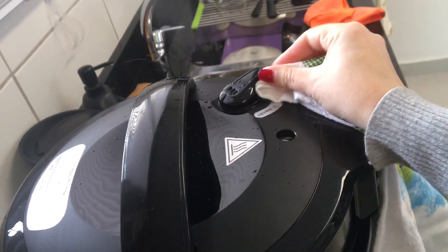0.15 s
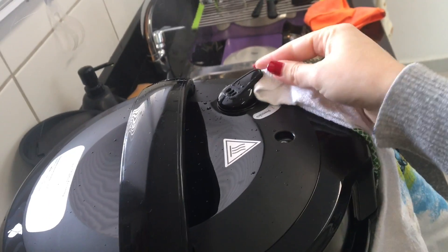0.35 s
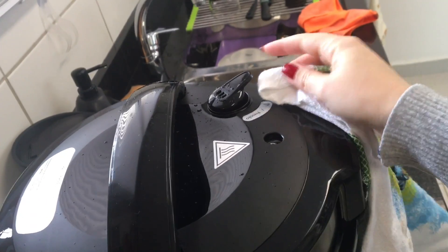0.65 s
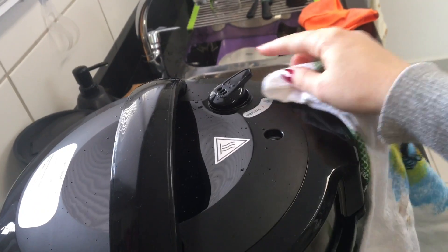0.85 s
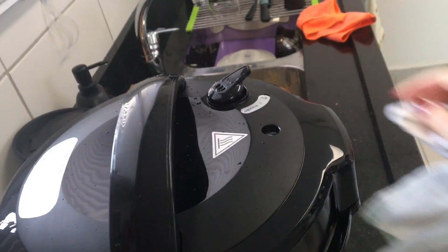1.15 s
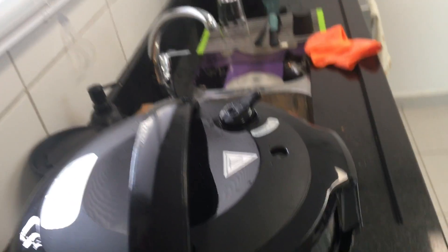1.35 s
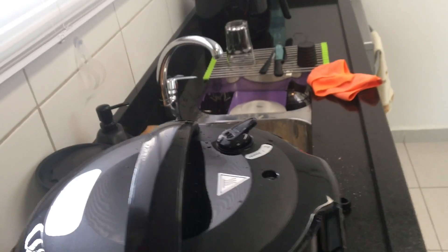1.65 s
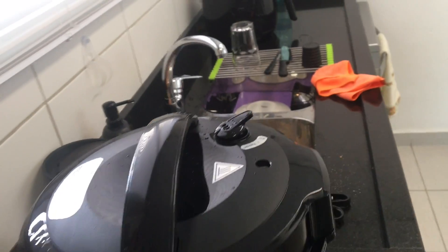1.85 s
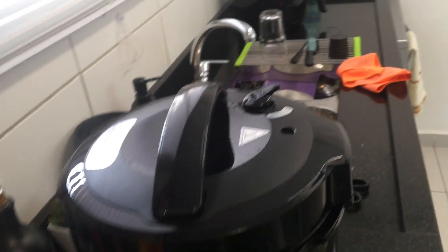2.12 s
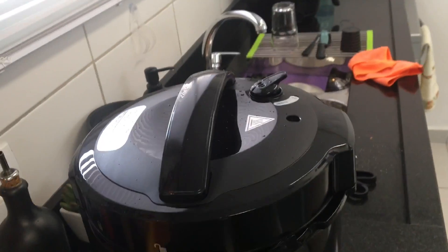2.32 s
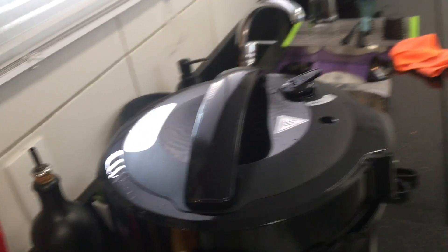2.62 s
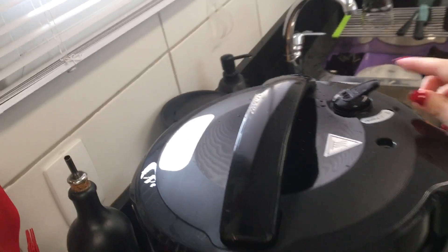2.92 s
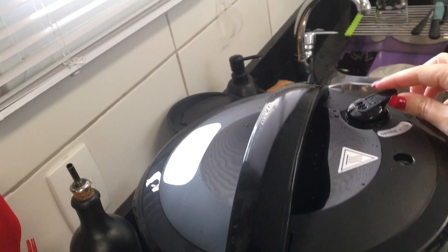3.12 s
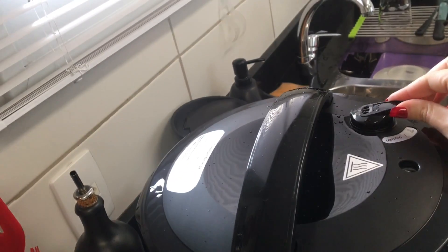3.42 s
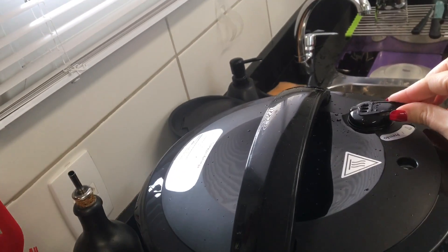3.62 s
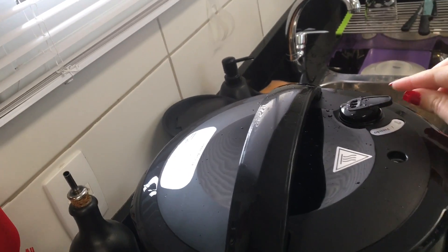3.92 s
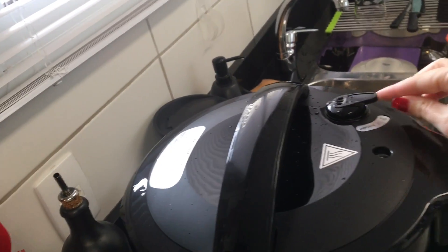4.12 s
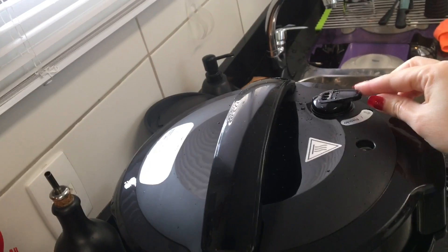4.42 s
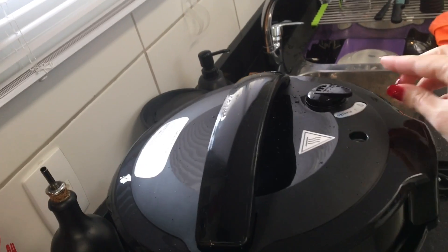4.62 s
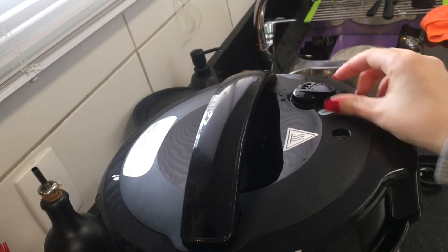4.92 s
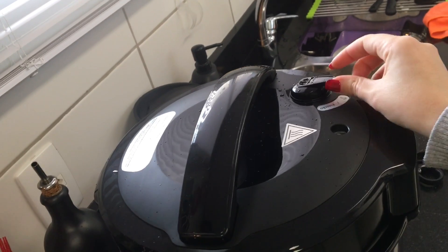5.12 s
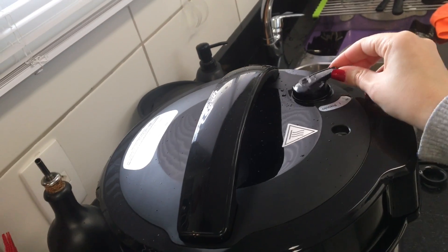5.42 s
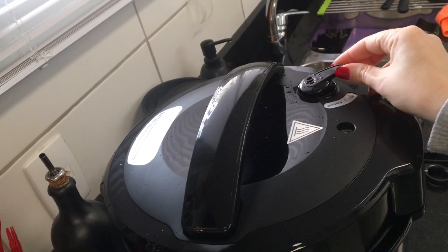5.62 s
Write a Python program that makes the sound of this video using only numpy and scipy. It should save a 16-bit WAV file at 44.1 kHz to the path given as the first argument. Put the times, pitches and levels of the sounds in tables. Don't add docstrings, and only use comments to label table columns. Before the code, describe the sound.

The sound opens mid-release: a loud, dense, bright jet of steam, very close, overdriving the microphone. At about 0.15 s the plastic valve handle snaps over with a strong hollow clack on the metal lid. The hiss, coloured by narrow airy resonances around 2 to 5 kHz with fizz above, declines steadily, noticeably softer by 1.5 s and thin by 3 s. A very faint low motor drone lies behind from roughly 1.3 to 2.5 s. From 3.3 to 3.8 s fingers nudge the handle, with soft dull knocks and slight swells in hiss. Near 4.5 s it lifts briefly, then shuts; the steam drops away into quiet low appliance rumble. Tiny nail ticks come at 5 s. At about 5.1 s the valve reopens with clicks, and a weaker puff swells around 5.25 s, then sinks by 5.6 s amid small taps. Short tiled-room reflections, centred.

```python
import sys
import numpy as np
from scipy import signal
from scipy.fft import rfft, irfft, next_fast_len
from scipy.io import wavfile
from scipy.ndimage import uniform_filter1d, map_coordinates

SR = 44100
rng = np.random.default_rng(int(sys.argv[2]) if len(sys.argv) > 2 else 0)


def generate_wav(sig):
    pcm = np.round(np.clip(np.atleast_2d(sig).T, -1, 1) * 32767).astype(np.int16)
    wavfile.write(sys.argv[1], SR, pcm)


def linear_from_db(decibels):
    return 10 ** (np.asarray(decibels, float) / 20)


N = 253575


def steam():
    # f/Hz, width/Hz, level/dB
    full = [(2224, 237, -3.5), (2510, 370, 0.0), (3240, 160, -14), (3900, 150, -14), (4390, 660, -6),
            (5090, 240, -7.5), (5640, 250, -9), (6400, 450, -12), (7000, 180, -10), (7580, 310, -14.5),
            (8170, 200, -11.5), (8820, 300, -10), (9450, 420, -8), (11000, 200, -10), (11560, 350, -9),
            (12770, 800, -11), (15200, 900, -22.5)]
    half = [(1266, 320, -15), (2227, 460, -3.5), (2662, 304, 2), (3375, 110, -7), (4034, 190, 2.5),
            (4576, 290, -0.5), (5300, 410, -6), (6030, 100, -8.5), (6830, 150, -16), (8650, 230, -10.5),
            (9500, 980, -10.5), (11200, 440, -10), (12150, 400, -10.5), (13000, 570, -11),
            (15300, 600, -16)]
    weak = [(2126, 370, -6.5), (2550, 260, -1.5), (3200, 120, -10), (3935, 160, -3), (4290, 320, -4.5),
            (5210, 260, -7), (5770, 270, -6.5), (6570, 220, -12.5), (9100, 300, -9), (9500, 400, -9.5),
            (10020, 250, -8), (10840, 400, -7.5), (11700, 270, -11.5), (12600, 400, -10.5),
            (13260, 460, -9.5)]
    leak = [(1850, 250, -10), (2570, 550, -1.5), (3800, 390, 1), (4350, 270, -9), (5560, 400, -20),
            (8900, 400, -3), (9600, 400, -6), (11800, 600, -14), (13150, 500, -7), (15100, 800, -14)]
    lifted = [(2070, 180, -22), (2300, 650, -8), (3420, 100, -8), (3846, 320, -1), (4360, 340, -9.5),
              (5050, 200, -17), (5520, 280, -12), (6150, 1100, -18.5), (8800, 200, -14), (9020, 960, -11),
              (11140, 370, -9), (11940, 1700, -8), (13100, 500, -22)]
    # f/Hz, level/dB per Hz
    breath_colour = [(150, -57), (300, -32.5), (480, -19.5), (650, -9.5), (900, -9.5), (1200, -7),
                     (1600, -4), (2200, -27), (4000, -120)]
    breath_lumps_db = 2

    hiss_db, fizz_db, breath_db, lift, pressure = valve()
    shares = [(1 - lift) * np.clip(1 - np.abs(pressure - k), 0, 1) for k in (2, 1, -0.08, -1)]
    shares.append(lift)
    caps = [
        cap(full, shear_db=4.5),
        cap(half, shear_db=3.5),
        cap(weak, shear_db=1.0),
        cap(leak, shear_db=-2.5),
        cap(lifted, shear_db=-9),
    ]
    upper = lambda f: 1 / (1 + (7600 / (f + 1)) ** 12)
    jet = np.zeros(N)
    for share, gain in zip(shares, caps):
        noise = eddies(patchy_db=1.04)
        hiss = unit(filtered(noise, lambda f: gain(f) * (1 - upper(f))))
        fizz = unit(filtered(noise, lambda f: gain(f) * upper(f)))
        jet += np.sqrt(share) * (hiss + linear_from_db(fizz_db - hiss_db) * fizz)
    sputter = linear_from_db(0.22 * wobble(7) + 0.47 * wobble(60) + 0.3 * wobble(600))
    jet *= linear_from_db(hiss_db - 1.0) * unit(sputter)
    breath = unit(filtered(eddies(patchy_db=-0.8), lambda f: linear_from_db(along(breath_colour, f))))
    return jet + linear_from_db(breath_db + breath_lumps_db * wobble(11)) * breath


def valve():
    # t/s, hiss level/dB
    flow = [(0, -8.5), (.6, -10), (1.37, -14), (1.75, -16), (2.02, -16.5), (2.2, -18.5), (2.88, -21),
            (3.3, -24.5), (4.15, -28.5), (4.5, -31), (5.75, -33)]
    # t/s, rise/s, hold/s, gain/dB, lift/0-1
    nudges = [
        (3.269, .18, .022, 5, .02),
        (3.56, 0.12, .11, 5.5, 0.13),
        (4.449, .065, .005, 5, 0.6),
        (5.226, .045, 0.22, 12.5, 0.74),
    ]
    # t/s, level/dB
    reopen = [
        (5.067, -47),
        (5.078, -16),
        (5.096, -4.5),
        (5.116, -4.5),
        (5.235, 0.5),
        (5.3, 0),
    ]
    reopen_s = reopen[0][0]
    full_until_s, spent_s = 0.91, 3.71
    settle_s = 0.024
    loose_per_s = 0.033
    shut_s, close_s = 4.52, 0.011
    tail_db, hiss_t60, fizz_t60, residue_db = -8, 0.52, 0.44, -40

    t = np.arange(N) / SR
    gain_db = np.zeros(N)
    lift = loose_per_s * t
    for start, rise, hold, db, raised in nudges:
        settling = max(settle_s * (db / 6) ** 2, .002)
        eased = ramp(start, rise) * np.exp(-np.maximum(t - start - rise - hold, 0) / settling)
        gain_db += db * eased
        lift += raised * eased

    shut = (t > shut_s) & (t < reopen_s)
    held_db = np.where(shut, gain_db[round(shut_s * SR)], gain_db)
    gap = linear_from_db(curves([(0, -120), (reopen_s - .001, -120), *reopen])[0])
    since = np.maximum(t - shut_s, 0)

    def dying(t60):
        closing = np.exp(-since / close_s)
        tail = linear_from_db(tail_db - 60 * since / t60)
        return (closing + tail) / (1 + linear_from_db(tail_db)) + linear_from_db(residue_db) * (since > 0)

    burst_db = 3 * np.exp(-t / 0.05)
    flow_db = curves(flow)[0] + burst_db
    hiss_db = flow_db + held_db + 20 * np.log10(dying(hiss_t60) + gap)

    late_gap = np.pad(gap, (round(.022 * SR), 0))[:N]
    aim_db = -0.56 - 1.3 * (1 - ramp(2.14 - .1, .2))
    fizz_open = dying(fizz_t60) * linear_from_db(-5 * ramp(shut_s, .1)) + late_gap
    fizz_db = flow_db + burst_db + aim_db + 0.47 * held_db + 20 * np.log10(fizz_open)

    near_db = 2.8 * (ramp(1.4, .1) - ramp(2.5, .3))
    breath_db = -26 + 0.75 * hiss_db + near_db

    leak = ramp(reopen_s - .1, .1) - ramp(5.2, 0.16)
    pressure = 2 * (1 - ramp(full_until_s, spent_s - full_until_s)) - leak
    return hiss_db, fizz_db, breath_db, np.clip(lift, 0, 1), pressure


def cap(modes, shear_db):
    # f/Hz, level/dB
    shear = [(1000, -57), (1800, -17), (3000, -19), (3600, -24.5), (4900, -23.5), (6000, -17.5),
             (7600, -24.5), (9000, -19), (10400, -22.5), (12000, -18.5), (14000, -20.5), (15700, -21.5)]

    def gain(f):
        power = linear_from_db(shear_db + along(shear, f)) ** 2
        for centre, width, db in modes:
            offset = 2 * (f - centre) / max(width, 130)
            power = power + linear_from_db(db) ** 2 / (1 + offset ** 2) ** 1.716
        return np.sqrt(power)

    return gain


def eddies(patchy_db):
    z = signal.stft(rng.standard_normal(N), nperseg=512)[2]
    field = uniform_filter1d(rng.standard_normal(z.shape), size=4, axis=0)
    field = uniform_filter1d(field, size=12, axis=1)
    return signal.istft(z * linear_from_db(patchy_db * unit(field)), nperseg=512)[1][:N]


def mirrored(x):
    # extra delay/s, level/dB, wander of the delay/s
    mirrors = [(.0016, -15.5, 0.000027), (.0043, -20.5, 0.000084), (.0078, -18.5, 0.00011),
               (0.0124, -15, 0.00014), (0.02, -20, 0.00031), (.027, -13, 0.00015)]
    out = x.copy()
    for delay, db, drift in mirrors:
        where = np.arange(N) - SR * (delay + drift * wobble(0.819))
        out += linear_from_db(db) * map_coordinates(x, [where], mode="mirror")
    return out


def handle():
    # t/s, peak level/dB
    clack = [
        (0.1446, 3.5),
    ]
    # f/Hz, level/dB, t60/s
    shell = [(89.8, -24.5, 0.092), (180, -18.5, 0.09), (262, -26, 0.17), (450, -12.5, 0.08),
             (555, -14, 0.15), (602, -11.5, 0.18), (648, -22, 0.29), (759, 0, 0.15), (780, -34.5, 0.3),
             (906, -13, .08)]
    # f/Hz, level/dB
    touches = [(.222, -43, -29, 634, -19), (2.458, -48, -30.5, 1190, -35), (3.354, -33.5, -47, 366, -29.5),
               (3.503, -27, -24, 377, -28), (3.803, -38, -37, 380, -26.5), (3.803, -44, -47, 750, -32.5),
               (4.575, -36, -35, 400, -29), (4.956, -55, -44, 740, -43), (5.078, -32.5, -31.5, 409, -30),
               (5.092, -39, -31, 1850, -33), (5.107, -32.5, -35, 244, -26), (5.108, -47, -32, 375, -22),
               (5.112, -42, -47, 777, -28), (5.248, -41, -28.5, 847, -30), (5.33, -48, -37, 585, -43),
               (5.400, -39, -24, 1340, -32), (5.44, -34, -29.5, 298, -33), (5.480, -37, -28, 686, -31),
               (5.515, -30.5, -28, 364, -23)]
    pushes = [
        (3.682, -36.5, -38, 612, -35),
        (4.540, -35, -34.5, 180, -35.5),
        (5.259, -44, -38, 374.6, -29),
        (5.521, -36, -40, 175.6, -26),
    ]
    # f/Hz, level/dB, t60/s
    lid = [(173, -2.5, 0.15), (277, 3, 0.093), (462, -2, 0.081), (625, 3.5, 0.053), (794, 2, 0.028)]
    # t/s, level/dB, length/s
    ticks = [
        (4.956, -45.5, 0.006),
        (4.999, -50, 0.05),
    ]
    touch_t60, push_t60 = 0.11, .3

    x = np.zeros(N + SR)
    for s, db in clack:
        knock = ring(shell, crack_db=6.5, rise=0.0015, rough=0.43)
        x[round(s * SR):][:SR // 2] += linear_from_db(db - 0.5) * knock
    contacts = [(*row, touch_t60) for row in touches] + [(*row, push_t60) for row in pushes]
    for s, thud_db, snap_db, *sings in sorted(contacts):
        modes = [(hz * rng.normal(1, 0.045), thud_db + db + rng.normal(0, 1.0), t60) for hz, db, t60 in lid]
        knock = ring(modes + [sings], snap_db + 9.5, rise=0.0016, rough=0.87)
        x[round(s * SR):][:SR // 2] += knock
    t = np.arange(SR // 10) / SR
    for s, db, length in ticks:
        scrape = linear_from_db(db - 6.5 * (t / length) ** 4) * rng.standard_normal(len(t))
        x[round(s * SR):][:len(t)] += scrape
    return x[:N]


def ring(modes, crack_db, rise, rough):
    t = np.arange(SR // 2) / SR
    tones = np.zeros(len(t))
    for hz, db, t60 in modes:
        wander = rough * wobble(45, size=len(t))
        decay = linear_from_db(db - 60 * t / max(t60, .02) + 2.6 * wander)
        tones += decay * np.sin(2 * np.pi * hz * t + wander)
    band = signal.butter(2, [250, 2300], "band", fs=SR, output="sos")
    click = 0.91 * (t < .0002)
    blow = rng.standard_normal(len(t)) * linear_from_db(-60 * t / 0.052) + click
    return tones * (1 - np.exp(-t / rise)) + linear_from_db(crack_db) * signal.sosfilt(band, blow)


def kitchen(x):
    # f/Hz, t60/s
    tiles = [(200, 0.59), (2000, 0.22), (10000, 0.14)]
    hz, t, z = signal.stft(rng.standard_normal(SR // 2), SR, nperseg=256)
    fading = linear_from_db(-60 * t / along(tiles, hz)[:, None])
    tail = signal.istft(z * fading, SR, nperseg=256)[1]
    late = np.pad(x, (300, 0))
    return signal.fftconvolve(late, tail / np.linalg.norm(tail))[:N]


def background():
    # f/Hz, level/dB per Hz
    rumble_colour = [(15, -48.5), (30, -15), (55, -9), (75, 1), (100, -4.5), (130, -7), (170, -12.5),
                     (260, -16), (600, -22), (1100, -25), (2000, -34), (4500, -45), (12000, -50.5),
                     (15500, -59)]
    t = np.arange(N) / SR
    noise = filtered(eddies(patchy_db=0.9), lambda f: linear_from_db(along(rumble_colour, f)))
    low = filtered(noise, lambda f: 1 / (1 + (f / 400) ** 2))
    lull_db = -2 * np.exp(-((t - 1.3) / 0.8) ** 2)
    low_gain = linear_from_db(-41.5 + .5 * wobble(1.5) + lull_db)
    rumble = (low_gain * low + linear_from_db(-38.5) * (noise - low)) / np.std(noise)
    running = ramp(1.3, .15) - ramp(2.4, .12)
    drone = linear_from_db(-47.5 + 2.5 * wobble(12)) * np.sin(2 * np.pi * 265 * t)
    return rumble + running * drone


def unit(x):
    return x / np.sqrt(np.mean(x ** 2) + 1e-20)


def along(points, hz):
    f, v = np.transpose(points)
    return np.interp(np.log(hz + 1), np.log(f + 1), v)


def curves(rows):
    s, *cols = np.transpose(rows)
    return [np.interp(np.arange(N) / SR, s, c) for c in cols]


def ramp(start, length):
    return np.clip((np.arange(N) / SR - start) / max(length, .001), 0, 1)


def wobble(rate, size=N):
    knots = rng.standard_normal(int(size * rate / SR) + 4)
    return map_coordinates(knots, [np.arange(size) * rate / SR])


def filtered(x, response):
    m = next_fast_len(N + SR // 2)
    return irfft(rfft(x, m) * response(np.fft.rfftfreq(m, 1 / SR)), m)[:N]


def scene():
    knocks = handle()
    heard = mirrored(steam()) + knocks + linear_from_db(-10) * kitchen(knocks) + background()
    return np.tile(heard, (2, 1))


def top_cut(x):
    return signal.sosfilt(signal.butter(12, 15810, fs=SR, output="sos"), x)


def record(dry):
    clipped = dry / (1 + np.abs(dry / 1.04) ** 8) ** (1 / 8)
    limited = np.array([filtered(channel, lambda f: f < 15800) for channel in clipped])
    return top_cut(limited)


dry = scene()
out = record(dry)
generate_wav(out)
```